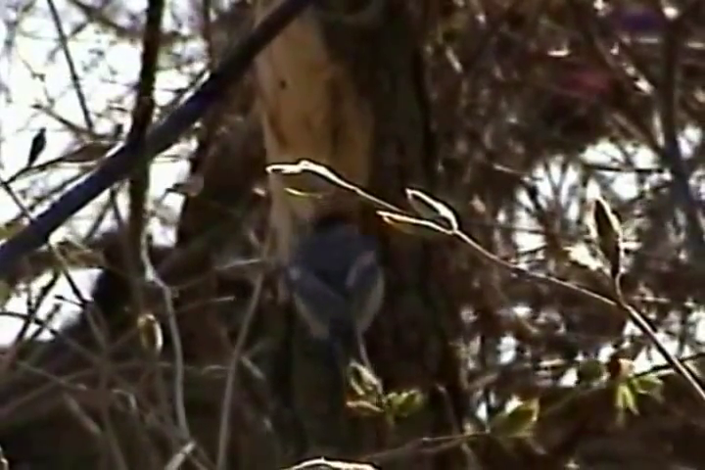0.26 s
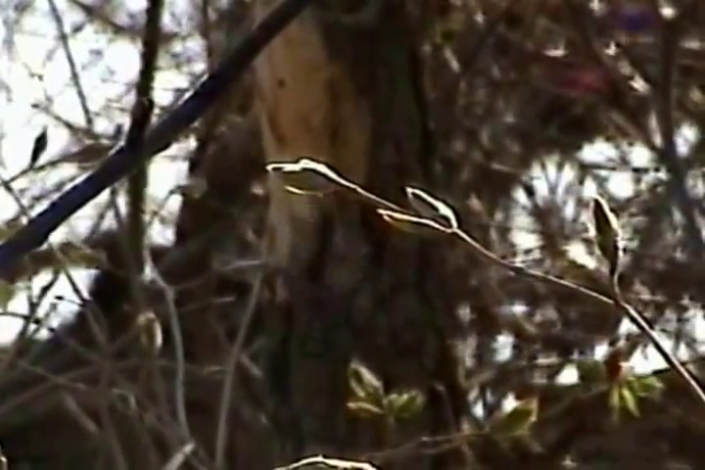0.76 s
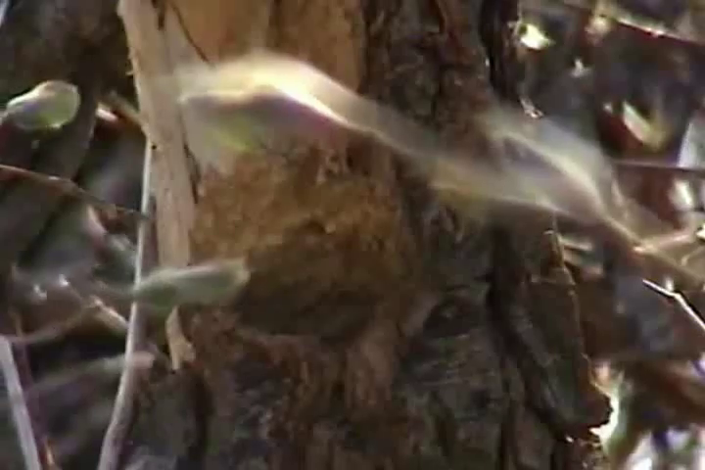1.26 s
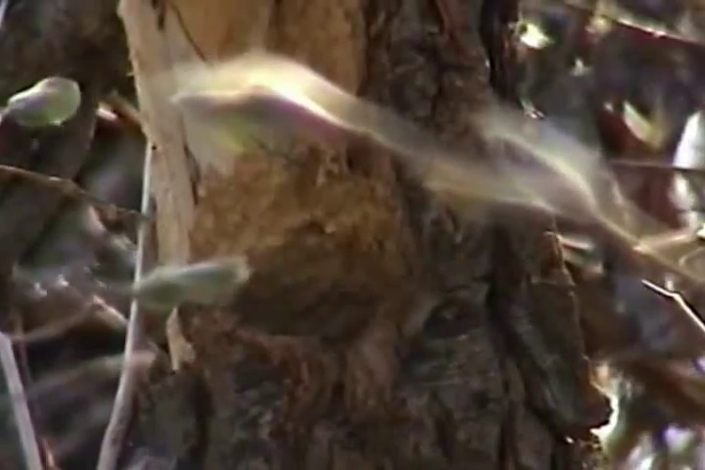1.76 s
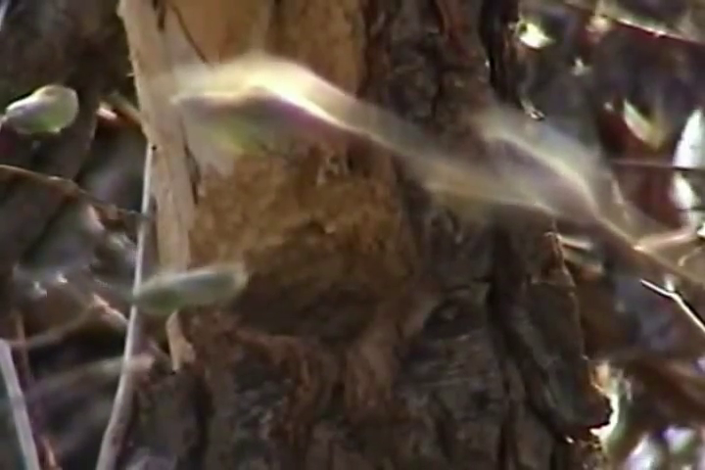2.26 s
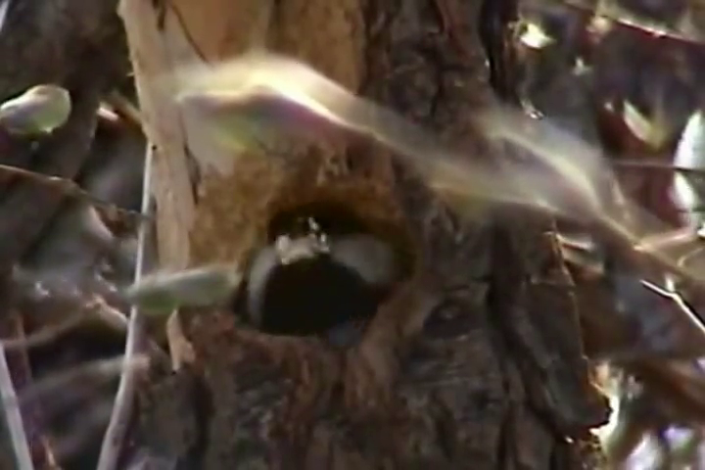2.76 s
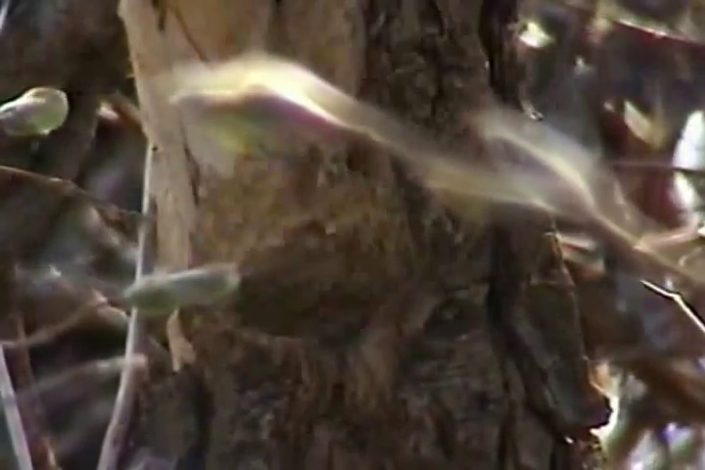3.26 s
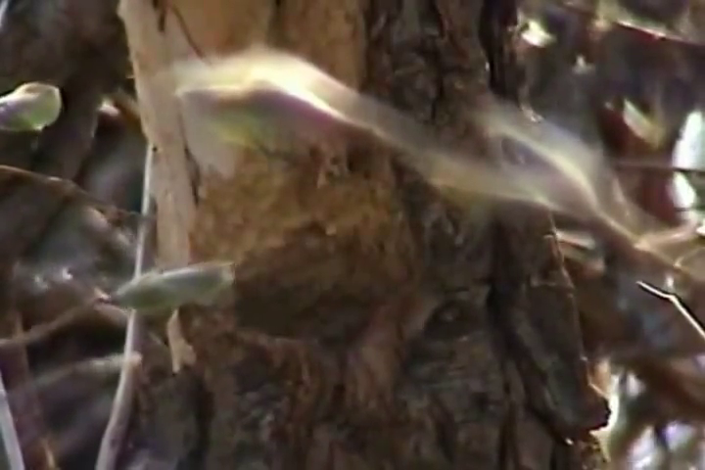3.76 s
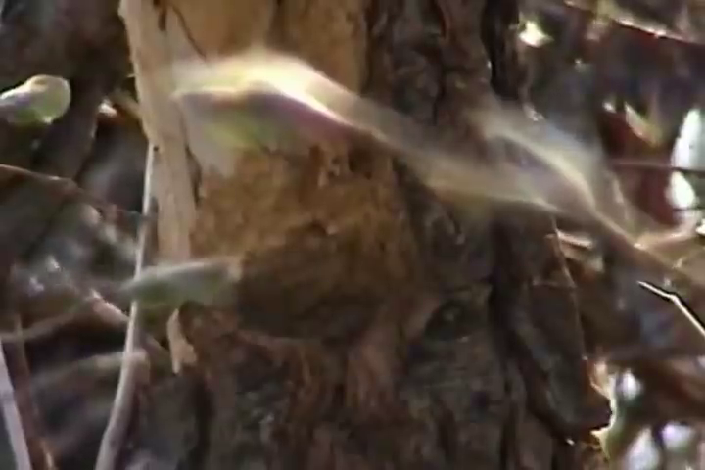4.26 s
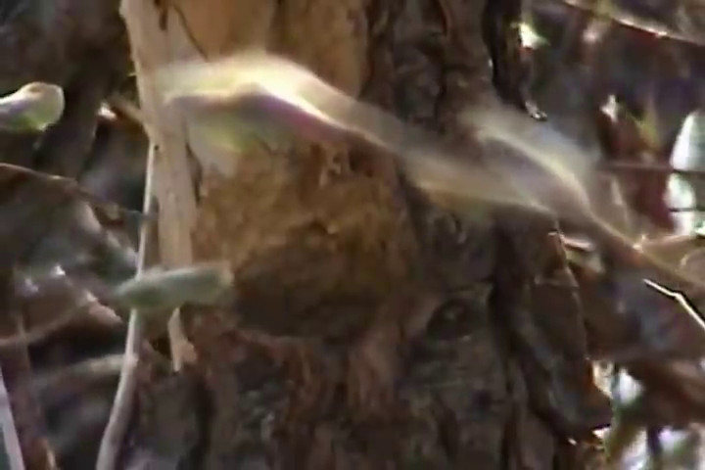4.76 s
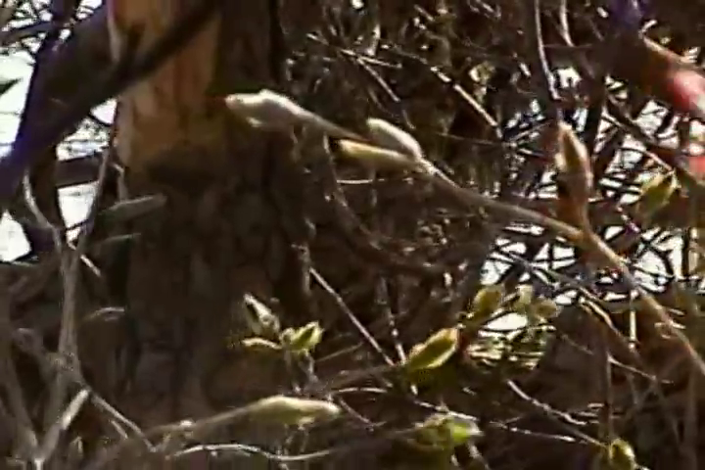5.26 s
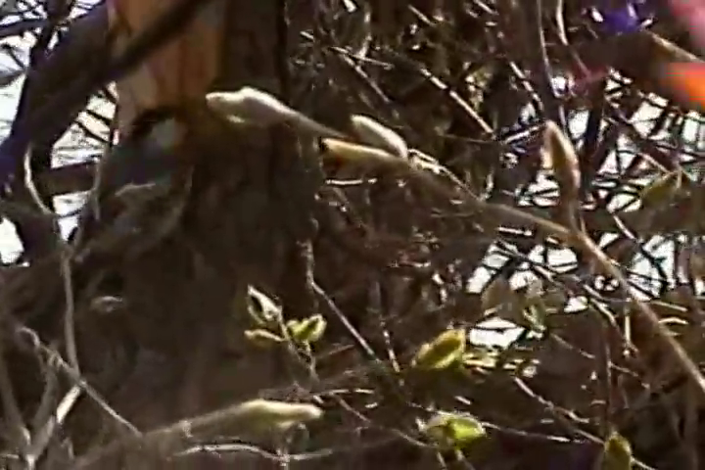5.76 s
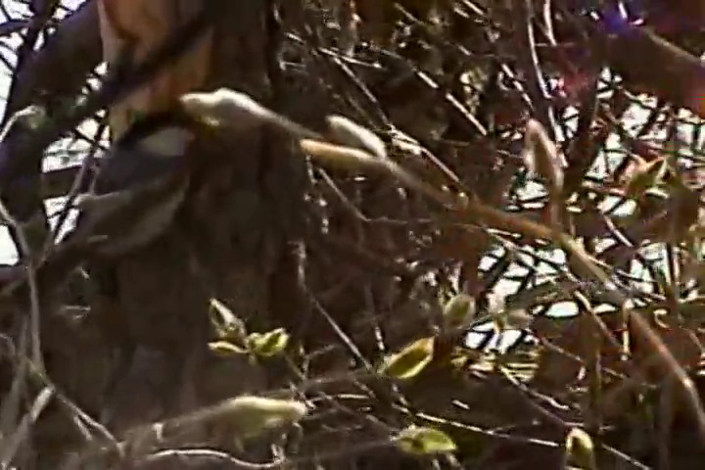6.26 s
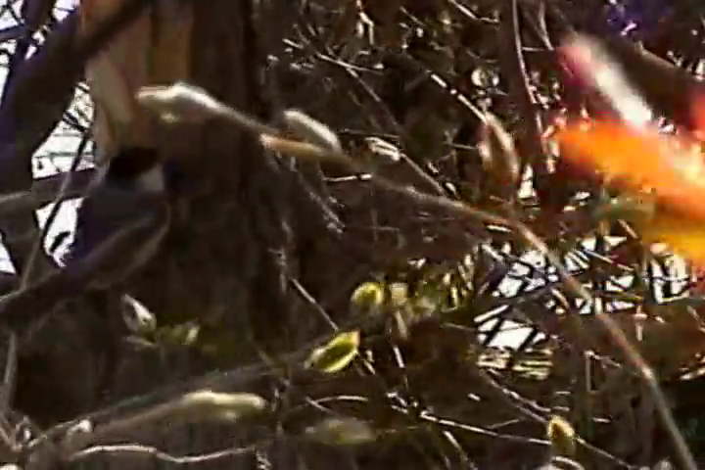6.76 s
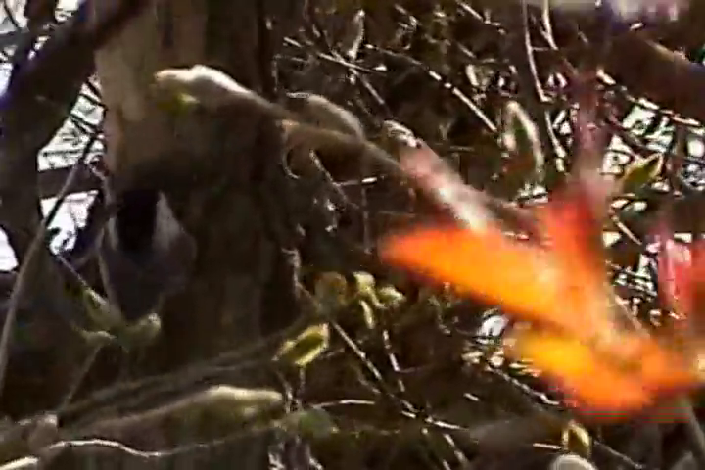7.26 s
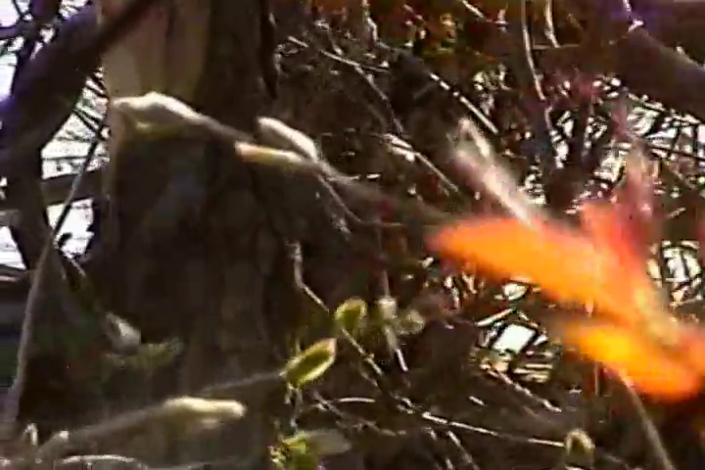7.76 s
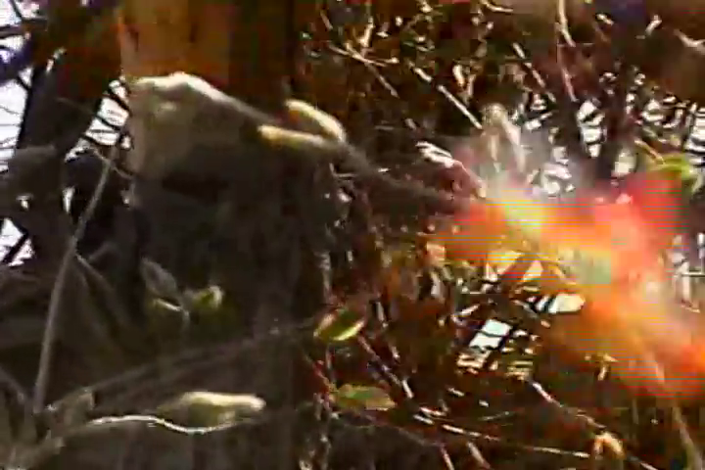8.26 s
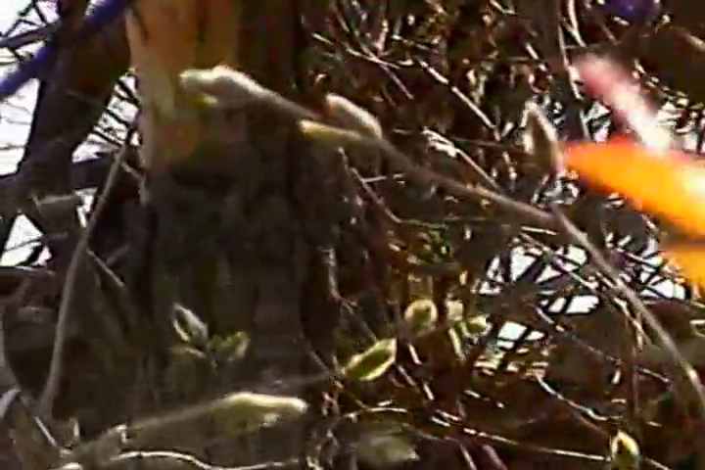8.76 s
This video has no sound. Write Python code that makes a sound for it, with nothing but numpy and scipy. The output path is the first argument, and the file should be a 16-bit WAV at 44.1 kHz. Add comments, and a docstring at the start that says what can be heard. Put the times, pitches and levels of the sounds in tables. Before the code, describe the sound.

A quiet outdoor thicket with a faint low rumble and soft hiss throughout. At about 0.6 seconds a small bird gives weak nasal squeaks, then bright, hoarse high chirps at 0.9 and 1.1. Faint distant birds slide downward between 1.3 and 2. From 2.1 to 2.7 a quick phrase of flicked whistles and scooped chirps ends in soft, falling hoots; a similar phrase follows from 3.35 to 4, its first hoot clearer and stronger. Quiet until 5, when low rasps come with a sudden puff of wind on the right. Squeaks and squeals follow at 5.2 to 5.6, then four sharp falling chicks from 5.7 to 6.05. Gusts keep buffeting softly on the right, with faint far birds. Piercing warbles and rising whistles sound at 7.3 to 7.55, a longer double-toned whistle to 7.8, then two quick warbles and a high buzz near 8.8 to 9. Calls echo off trunk and twigs.

```python
"""Squeals, soft hoots, rasps and quick whistles: chickadees call at a nest hole in a dead trunk among shrubs.
Each call is a stack of harmonics on a drawn pitch curve; in some, both sides of the syrinx sound at once.
Random echo taps throw the calls back from trunk and thicket, and other birds glide softly far off.
Shaped noise makes a low outdoor rumble and, from halfway, a breeze that buffets the right side."""
import sys
import numpy as np
from scipy import signal
from scipy.fft import rfft, irfft, next_fast_len
from scipy.io import wavfile
from scipy.ndimage import uniform_filter1d

SR = 44100
rng = np.random.default_rng(int(sys.argv[2]) if len(sys.argv) > 2 else 0)


def wav_record(signal):
    """Record a signal, one row per channel, as 16-bit PCM in the file named by sys.argv[1]."""
    frames = np.transpose(np.atleast_2d(signal))
    bounded = np.clip(frames, -1, 1)
    # unit amplitude maps onto the largest positive 16-bit level
    quanta = np.round(bounded * 32767).astype(np.int16)
    wavfile.write(sys.argv[1], SR, quanta)


N = 396900

# Call levels are before the trim of each group in the mix; spectra are relative.
# Soft hoots, nearly pure. Each row: start in seconds, held length in seconds, pitch in Hz, level in dB,
# swell over the note in dB, dive into it (0-1), bow and final sag of the pitch as shares.
HOOTS = [(2.395, .163, 2680, -26, -1, .8, .022, .12), (2.632, .093, 2052, -32, -1, 0, .014, .23),
         (3.684, .146, 2565, -18.7, 7, 1, 0, .1), (3.911, .103, 2030, -31.5, 3, 0, .032, .2)]
# Flicks: the pitch shoots up to a cusp and drops. Each row: cusp in seconds, rise in seconds,
# start in Hz, cusp in Hz, rising and falling level in dB at the favoured pitch.
FLICKS = [(2.111, 0.034, 2350, 5500, -33.5, -25.5), (2.259, 0.023, 4050, 5600, -28.5, -32),
          (3.365, 0.017, 3190, 6570, -27.5, -42), (3.531, 0.011, 5300, 6500, -21.5, -19.5)]
# Scoops: a rounded rise and a quick drop. Each row: top in seconds, rise in seconds, fall in seconds,
# start in Hz, top in Hz, level in dB at the favoured pitch.
SCOOPS = [(2.165, 0.032, 0.013, 1855, 3150, -17), (2.309, 0.037, 0.0098, 1765, 3060, -19.5),
          (3.341, 0.0091, .006, 2170, 2310, -29), (3.413, 0.029, .016, 2150, 3090, -20),
          (3.589, 0.034, 0.012, 2020, 3030, -19.5)]

# Arches: level swells and fades while pitch bends to a turning point and away. Each row of the next
# five tables: turning point in seconds, length before and after it in seconds, start in Hz,
# turning point in Hz, end in Hz, sharpness, level in dB, drop at the ends in dB.
# Nasal squeals.
SQUEALS = [ (.620, 0.068, 0.048, 1010, 1440, 1410, 0.71, -40.5, 15),
           (.690, 0.039, 0.023, 1421, 1902, 1520, 1.8, -32.5, 9.6),
           (5.425, 0.024, .036, 2150, 4836, 1610, 5, -31, 5.3),
           (5.570, .088, .068, 1581, 3955, 2190, 1.66, -30.5, 3.8)]
# Bright, hoarse chirps.
CHIRPS = [(1.112, .059, .026, 2250, 4020, 3950, 1.3, -26, 21),
          (5.229, .019, .017, 2850, 3650, 2150, 4.5, -32, 4)]
# Low rasps.
RASPS = [(4.968, .071, .036, 525, 610, 560, 1.1, -38.5, 12), (5.062, .028, .056, 580, 565, 545, .8, -40, 9)]
# A high buzz.
BUZZES = [(8.978, .017, 0.032, 5850, 5500, 5570, 0.85, -28.5, 8)]
# Clear whistles.
WHISTLES = [(5.424, .012, .022, 4630, 5000, 4630, 2.3, -33, 6.7),
            (5.485, 0.044, 0.023, 4750, 4740, 4830, 1, -38, 6),
            (7.499, .020, 0.047, 4000, 6920, 6540, 0.91, -20, 15.4),
            (7.543, 0.021, 0.0077, 6900, 7830, 8300, 2.5, -21, 3)]
# Notes from both sides of the syrinx. Each row: an arch for the low side, then one for the high side.
TWO_VOICED = [ ((.940, .053, .024, 2350, 4460, 4420, 2.6, -27.5, 14),
              (.942, .055, .022, 3650, 5285, 5330, 2.8, -23.5, 19)),
              ((7.785, .150, .026, 3470, 3760, 3640, 1.8, -18.5, 26),
              (7.672, .071, .135, 4950, 5360, 5420, .9, -25.5, 21))]

# Warbles: the high side swings, then settles; the low side follows in part. Each row: last peak in seconds,
# length before and after it in seconds, entry in Hz, peak in Hz, rest in Hz, depth of the swing as a share,
# level in dB, low side in Hz, low side level in dB, how far the low side follows (0-1).
WARBLES = [(7.377, 0.075, 0.02, 4750, 8430, 7360, .2, -22.5, 5380, -30.5, .55),
           (8.789, 0.028, 0.021, 6840, 7580, 5700, 0.34, -21, 4050, -47, 0.2),
           (8.872, .026, 0.019, 4740, 6780, 5370, 0.26, -23.5, 3390, -47, 0.1)]
# 'Chick' notes: a swing and a long fall. Each row: last peak in seconds, peak in Hz,
# level in dB at the favoured pitch, length before the peak in seconds.
CHICKS = [(5.738, 9040, -24.5, .036), (5.810, 8920, -24, 0.023), (5.948, 9520, -25, 0.032),
          (6.017, 9050, -26.5, 0.023)]
# Plain glides of birds far off. Each row: start in seconds, length in seconds, start in Hz, end in Hz, level in dB.
FAR_SONG = [(0.019, .2, 3530, 3420, -64), (1.27, .19, 4010, 2522, -50.5), (1.564, 0.19, 2537, 2427, -52.5),
            (1.861, 0.12, 2354, 2076, -53), (6.157, 0.09, 2460, 2605, -60), (6.343, 0.076, 2900, 2770, -60),
            (6.522, 0.098, 3330, 3240, -60.5), (7.009, 0.38, 4230, 4280, -64),
            (7.931, 0.16, 2227, 2090, -56), (8.377, 0.095, 3420, 3240, -54.5),
            (8.538, .2, 4490, 4250, -63.5)]

# Balance of the harmonics, from the first upwards. Each entry: level in dB.
HOOT_DB = [17, -1, -11, -27.5]
SQUEAL_DB = [-5, 1, -4.5, -17.5, -16.5, -20]
CHIRP_DB = [11.5, -1, -7.5]
WHISTLE_DB = [-0.5, -14]
RASP_DB = [-37, -34, -4.5, 7.5, 0, -2.5, -7, -16, -36, -17, -27, -17.5, -21, -32, -19, -20]
# Throat resonance in the hoots and in the squeals. Each row: frequency in Hz, gain in dB.
HOOT_THROAT = [(1500, -20.5), (2100, 5), (3000, -4), (3900, -14.5), (5100, -23.5), (7000, -3.5),
               (10000, -6.5)]
SQUEAL_THROAT = [(1500, -6.5), (1950, -11.5), (2400, 2), (3900, -1), (4800, 2), (7500, 2.5), (10000, -1)]
# Breathy hiss of hoarse calls. Each row: frequency in Hz, level in dB per Hz.
HISS = [(1100, -16), (2400, -3), (6000, 0), (10000, -14.5)]
# Decay of the thicket's echo. Each row: frequency in Hz, time to fall by 60 dB in seconds.
THICKET = [(2400, 1.25), (3800, 1.044), (5200, 0.9), (10000, 0.31)]

# Gusts on the microphone. Each row: full strength from in seconds, length in seconds, relative level in dB.
GUSTS = [(5.066, 0.54, -44), (5.6, .2, -51.5), (6.195, 0.03, -45), (6.472, 0.022, -45),
         (6.867, 0.17, -46.5), (7.156, 1.0, -43), (8.253, 0.53, -45.5), (8.925, 0.049, -46.5)]
# Sudden puffs of wind. Each row: start in seconds, relative level in dB, length in seconds.
PUFFS = [(5.057, -31.5, 0.097), (5.147, -31, 0.02), (5.295, -43.5, 0.024), (5.895, -52.5, 0.051)]
# Colour of the gusts and of the brighter puffs. Each row: frequency in Hz, level in dB per Hz.
BUFFET = [(25, -15), (80, 3.5), (170, 1), (300, -10), (520, -20), (3000, -56)]
PUFF = [(30, -5), (130, 7.5), (400, 5), (800, -10.5), (10000, -41)]
# Colour of the outdoor air. Each row: frequency in Hz, level in dB per Hz.
AIR = [(15, -35.5), (25, -2.5), (139, -8), (254, -12.5), (288, -11), (465, -14.5), (645, -15.5),
       (10300, -28), (13400, -98), (22000, -120)]
# How alike left and right are in the air. Each row: frequency in Hz, likeness as a share.
AIR_SAME = [(60, 0.72), (800, 0.028), (10000, .25)]

ALONG = np.linspace(0, 1, 300)  # position along a note
ARCH_EDGE_S, ARCH_EDGE_DB = 0.0097, 3.5  # every arch fades in and out
SAG_S, SAG_DB = .023, 13.5  # at the end of a hoot pitch and level sag together
DIVE, DIVE_S, UNDERSHOOT, RECOVER_S = 1.5, .0042, .36, .017  # the dive overshoots and recovers (shares, s)
HOOT_ATTACK_S, HOOT_ATTACK_DB = 0.0033, 24
FLICK_FALL_S, FLICK_DROP_S, FLICK_LOW_HZ = 0.018, .0042, 1725  # fall length, its time constant, landing pitch
FLICK_BEST_HZ, FLICK_DB_PER_OCTAVE = 3170, 25.5  # loudest at this pitch, weaker away from it
SCOOP_END_HZ, SCOOP_SHARPNESS = 2320, 0.99
SCOOP_BEST_HZ, SCOOP_DB_PER_OCTAVE = 2767, 37.5
SWING_S, ENTRY_S, SETTLE_S = 0.03, .013, .0095  # one swing; leaving the entry pitch; settling
WARBLE_ATTACK_S, WARBLE_RELEASE_S, WARBLE_EDGE_DB = .02, 0.0065, 22.5
CHICK_FALL_S, CHICK_REST, CHICK_DEPTH, CHICK_ENTRY = 0.037, .61, .13, 0.95  # s, then shares of the peak pitch
CHICK_BEST_HZ, CHICK_DB_PER_OCTAVE, CHICK_EDGE_DB = 6600, 15.5, 18
UNDERTONE_HZ, UNDERTONE_END_HZ, UNDERTONE_DB = 5075, 4900, -13.5  # a soft tone under each 'chick' fall
GLIDE_EDGE_DB = 7
GUST_RISE_S, GUST_FALL_S, LULL_DB = 0.072, 0.089, -56.5
AIR_LEVEL_DB = -50.79
EDGE_HZ = 10550  # edge of the low-pass in Hz; the sound is dark above it


def birds():
    """All the calls, near and far, each group with its own trim and share of echo."""
    return (quick_hoots() + clear_hoots() + squeals_and_chicks()
            + chirps_rasps_and_buzzes() + whistles_and_warbles() + far_birds())


def quick_hoots():
    """Flicks, scoops and the first hoot: a low, slightly rough voice with breath in it."""
    notes = [flick(*row) for row in FLICKS] + [scoop(*row) for row in SCOOPS] + [hoot(*HOOTS[0])]
    calls = sing(notes, HOOT_DB, jitter=0.0054, jitter_hz=203, shimmer_db=3.0, throat=HOOT_THROAT)
    calls = hoarse(calls, hiss_db=-28.5)
    return gain_of(-3.0) * outdoors(calls, near_db=-3, far_db=-9.0, balance_db=1.3, same=0.49)


def clear_hoots():
    """The later hoots reach the microphone more directly and stay steady."""
    notes = [hoot(*row) for row in HOOTS[1:]]
    calls = sing(notes, HOOT_DB, jitter=.002, jitter_hz=200, shimmer_db=1.8, throat=HOOT_THROAT)
    return gain_of(-1) * outdoors(calls, near_db=-17, far_db=-15, balance_db=1.9)


def squeals_and_chicks():
    """Nasal squeals with fluttering harmonics, and high falling 'chick' notes."""
    squeals = sing(arches(SQUEALS), SQUEAL_DB, jitter=0.0089, jitter_hz=610, shimmer_db=2.0,
                   throat=SQUEAL_THROAT, flutter_db=3.5)
    chicks = sing(chick_notes(), WHISTLE_DB, jitter=.006, jitter_hz=600, shimmer_db=1)
    calls = hoarse(squeals + chicks, hiss_db=-23.5)
    return gain_of(-2.5) * outdoors(calls, near_db=-3.5, far_db=-7, balance_db=0.5, same=0.91)


def chirps_rasps_and_buzzes():
    """The harsh calls: strong pitch jitter, and fluttering harmonics in the chirps and rasps."""
    chirps = sing(arches(CHIRPS), CHIRP_DB, jitter=.025, jitter_hz=900, shimmer_db=1.6, flutter_db=2)
    rasps = sing(arches(RASPS), RASP_DB, jitter=.037, jitter_hz=220, shimmer_db=3, flutter_db=5)
    buzzes = sing(arches(BUZZES), CHIRP_DB, jitter=.07, jitter_hz=1000, shimmer_db=2)
    return gain_of(-0.5) * outdoors(chirps + rasps + buzzes, near_db=-3.0, far_db=-7.0, balance_db=.8)


def whistles_and_warbles():
    """Clear whistles from one side of the syrinx; double notes and warbles from both."""
    whistles = sing(arches(WHISTLES), WHISTLE_DB, jitter=0.0059, jitter_hz=500, shimmer_db=3.5)
    doubles = sing_both([two_voiced(*pair) for pair in TWO_VOICED],
                        jitter=.005, jitter_hz=400, shimmer_db=1.2, coupling_db=-12)
    warbles = sing_both([warble(*row) for row in WARBLES],
                        jitter=.012, jitter_hz=800, shimmer_db=1.8, coupling_db=-11)
    calls = hoarse(whistles + doubles + warbles, hiss_db=-23)
    return gain_of(-6.0) * outdoors(calls, near_db=-3, far_db=-5.5, balance_db=0.2)


def far_birds():
    """Plain glides with strong echo, leaning to the right."""
    song = sing([glide(*row) for row in FAR_SONG], WHISTLE_DB, jitter=.03, jitter_hz=90, shimmer_db=3)
    return gain_of(-3.5) * outdoors(song, near_db=-1.5, far_db=0.5, balance_db=-5)


def hoot(start, held_s, pitch_hz, level_db, swell_db, dive, bow, droop):
    """A held tone, with or without a dive onto it, that sags as it ends. Rows of (s, Hz, dB)."""
    t = ALONG * (held_s + SAG_S)
    held = np.minimum(t / held_s, 1)
    sag = np.maximum(t - held_s, 0) / SAG_S
    entry = dive * (DIVE * np.exp(-t / DIVE_S) - UNDERSHOOT * np.exp(-t / RECOVER_S))
    hz = pitch_hz * (1 + entry + bow * np.sin(np.pi * held) - droop * sag)
    attack_db = HOOT_ATTACK_DB * np.exp(-t / HOOT_ATTACK_S)
    db = level_db + swell_db * (held - .5) - attack_db - SAG_DB * sag ** 0.65
    return np.transpose([start + t, hz, db])


def flick(cusp_s, rise_s, start_hz, cusp_hz, rising_db, falling_db):
    """An ever faster rise, then a steep drop. Rows of (s, Hz, dB)."""
    t = ALONG * (rise_s + FLICK_FALL_S) - rise_s
    rising_hz = start_hz * (cusp_hz / start_hz) ** ((1 + t / rise_s) ** 2)
    falling_hz = FLICK_LOW_HZ + (cusp_hz - FLICK_LOW_HZ) * np.exp(-abs(t) / FLICK_DROP_S)
    hz = np.where(t < 0, rising_hz, falling_hz)
    db = np.where(t < 0, rising_db, falling_db) - off_best(hz, FLICK_BEST_HZ, FLICK_DB_PER_OCTAVE)
    return np.transpose([cusp_s + t, hz, db])


def scoop(top_s, rise_s, fall_s, start_hz, top_hz, level_db):
    """An arch that is loudest where its pitch comes nearest the favoured one. Rows of (s, Hz, dB)."""
    s, hz, db = arch(top_s, rise_s, fall_s, start_hz, top_hz, SCOOP_END_HZ, SCOOP_SHARPNESS, level_db, 0).T
    return np.transpose([s, hz, db - off_best(hz, SCOOP_BEST_HZ, SCOOP_DB_PER_OCTAVE)])


def off_best(hz, best_hz, db_per_octave):
    """Loss in dB as the pitch leaves the one that the throat favours."""
    return db_per_octave * abs(np.log2(hz / best_hz))


def arch(turn_s, before_s, after_s, start_hz, turn_hz, end_hz, sharpness, level_db, ends_db):
    """Level swells and fades while pitch bends to a turning point and away. Rows of (s, Hz, dB)."""
    t = ALONG * (before_s + after_s) - before_s
    slack = 1 - abs(np.cos(np.pi / 2 * t / np.where(t < 0, before_s, after_s))) ** sharpness
    hz = turn_hz * (np.where(t < 0, start_hz, end_hz) / turn_hz) ** slack
    faded = np.maximum(1 - np.minimum(t + before_s, after_s - t) / ARCH_EDGE_S, 0)
    return np.transpose([turn_s + t, hz, level_db - ends_db * slack - ARCH_EDGE_DB * faded])


def arches(table):
    """One arched note for each row."""
    return [arch(*row) for row in table]


def chick_notes():
    """The same gesture each time, entered earlier or later; the other side holds a soft tone under its fall."""
    notes = []
    for peak_s, peak_hz, level_db, before_s in CHICKS:
        t, hz, faded = swing(before_s, CHICK_FALL_S, CHICK_ENTRY * peak_hz, peak_hz,
                             CHICK_REST * peak_hz, CHICK_DEPTH)
        edge_db = CHICK_EDGE_DB * faded * np.where(t < 0, .3, 1)  # gentler on the way in
        db = level_db - off_best(hz, CHICK_BEST_HZ, CHICK_DB_PER_OCTAVE) - edge_db
        notes.append(np.transpose([peak_s + t, hz, db]))
        notes.append(glide(peak_s + 0.0034, CHICK_FALL_S, UNDERTONE_HZ, UNDERTONE_END_HZ,
                           level_db + UNDERTONE_DB))
    return notes


def swing(before_s, after_s, entry_hz, peak_hz, rest_hz, depth):
    """Time from the last peak, a pitch that swings and settles, and how far the note is faded."""
    t = ALONG * (before_s + after_s) - before_s
    swinging_hz = peak_hz * (1 - depth * abs(np.sin(np.pi * t / SWING_S)) ** 1.5)
    settling_hz = rest_hz + (peak_hz - rest_hz) * np.exp(-abs(t) / SETTLE_S)
    hz = np.where(t < 0, swinging_hz, settling_hz)
    hz = hz + (entry_hz - hz) * np.exp(-((t + before_s) / ENTRY_S) ** 2)
    fade_in = np.maximum(1 - (t + before_s) / WARBLE_ATTACK_S, 0) ** 2
    fade_out = np.maximum(1 - (after_s - t) / WARBLE_RELEASE_S, 0)
    return t, hz, fade_in + fade_out


def warble(peak_s, before_s, after_s, entry_hz, peak_hz, rest_hz, depth, level_db, low_hz, low_db, follow):
    """A swinging high side with a low side in tow. Rows of (s, low Hz, low dB, high Hz, high dB)."""
    t, hz, faded = swing(before_s, after_s, entry_hz, peak_hz, rest_hz, depth)
    following_hz = low_hz * (hz / peak_hz) ** follow
    return np.transpose([peak_s + t, following_hz, low_db - 5 * faded, hz, level_db - WARBLE_EDGE_DB * faded])


def two_voiced(low_row, high_row):
    """Two overlapping arches. Rows of (s, low Hz, low dB, high Hz, high dB)."""
    sides = arch(*low_row).T, arch(*high_row).T
    s = np.union1d(sides[0][0], sides[1][0])
    columns = []
    for at, hz, db in sides:
        columns += [np.interp(s, at, hz), np.interp(s, at, db, left=-90, right=-90)]
    return np.transpose([s, *columns])


def glide(start, length, start_hz, end_hz, level_db):
    """A straight slide that swells and fades. Rows of (s, Hz, dB)."""
    hz = start_hz + (end_hz - start_hz) * ALONG
    db = level_db - GLIDE_EDGE_DB * (2 * ALONG - 1) ** 2
    return np.transpose([start + length * ALONG, hz, db])


def sing(notes, levels_db, jitter, jitter_hz, shimmer_db, throat=None, flutter_db=0):
    """Notes from one side of the syrinx."""
    out = np.zeros(N)
    for rows in notes:
        start, (hz, db) = contours(rows)
        phase, size = membrane(hz, db, jitter, jitter_hz, shimmer_db)
        add(out, start, size * harmonics(phase, hz, levels_db, throat, flutter_db))
    return out


def sing_both(notes, jitter, jitter_hz, shimmer_db, coupling_db):
    """Both sides sound at once and modulate each other, which adds a tone at the sum of their pitches."""
    out = np.zeros(N)
    for rows in notes:
        start, (low_hz, low_db, high_hz, high_db) = contours(rows)
        low, low_size = membrane(low_hz, low_db, jitter, jitter_hz, shimmer_db)
        high, high_size = membrane(high_hz, high_db, jitter, jitter_hz, shimmer_db)
        add(out, start, low_size * harmonics(low, low_hz, WHISTLE_DB))
        add(out, start, high_size * harmonics(high, high_hz, WHISTLE_DB))
        add(out, start, gain_of(coupling_db) * np.minimum(low_size, high_size) * np.sin(low + high))
    return out


def contours(rows):
    """Start time and the columns of a note as smooth curves, one value a sample."""
    s, *columns = np.transpose(rows)
    t = np.arange(s.min(), s.max(), 1 / SR)
    return s.min(), [uniform_filter1d(np.interp(t, s, c), size=130) for c in columns]


def membrane(hz, db, jitter, jitter_hz, shimmer_db):
    """One side of the syrinx: its phase and its amplitude, both a little unsteady."""
    count = len(hz)
    phase = 2 * np.pi * np.cumsum(hz * (1 + jitter * wobble(count, jitter_hz))) / SR
    edge = np.minimum(np.arange(count), np.arange(count)[::-1]) / (.002 * SR)  # 2 ms fades
    size = np.sqrt(2) * gain_of(db + shimmer_db * wobble(count, jitter_hz))
    return phase, size * np.minimum(edge, 1)


def harmonics(phase, hz, levels_db, throat=None, flutter_db=0):
    """Harmonics with about the power of one sine; the throat may favour some, and each may flutter."""
    k = np.arange(1, len(levels_db) + 1)[:, None]
    gains = gain_of(np.array(levels_db)[:, None] + (read(throat, k * hz) if throat else 0))
    gains = gains / np.linalg.norm(gains, axis=0)
    gains = gains * gain_of([flutter_db * wobble(len(hz), hz=104) for _ in k])
    return np.sum(gains * np.sin(k * phase) * (k * hz < SR / 2), axis=0)


def hoarse(x, hiss_db):
    """Air rushing through the syrinx adds a hiss that follows the loudness of the call."""
    loudness = np.sqrt(abs(uniform_filter1d(x ** 2, size=200)))
    return x + gain_of(hiss_db) * loudness * noise(HISS)


def outdoors(x, near_db, far_db, balance_db, near_t60=0.23, same=0.27):
    """Direct sound, quick scatter from trunk and twigs, and the long tail of the thicket."""
    t = np.arange(SR) / SR
    taps = rng.standard_normal((3, SR)) * (rng.random((3, SR)) < 4000 / SR)  # about 4000 echoes a second
    # the two ports of the microphone lie close together and share some of the echoes
    taps = np.sqrt(same) * taps[0] + np.sqrt(1 - same) * taps[1:]
    near = taps * gain_of(-60 * t / near_t60) * (t > .001)
    # the reversed taps give the tail its own pattern; each band dies away at its own rate
    hz, frame_s, z = signal.stft(taps[:, ::-1], SR, nperseg=256)
    decay = gain_of(-60 * frame_s / read(THICKET, hz)[:, None])
    far = signal.istft(z * decay, SR, nperseg=256)[1][:, :SR]
    far *= np.minimum(t / 0.0017, 1)
    echoes = (gain_of(near_db) * evened(near) + gain_of(far_db) * evened(far)) / np.sqrt(SR)
    direct = x * gain_of([[balance_db / 2], [-balance_db / 2]])
    return direct + signal.fftconvolve(x[None], echoes, axes=1)[:, :N]


def wind():
    """Lumpy eddies on the right port, in gusts with a lull between; sudden puffs are brighter."""
    t = np.arange(N) / SR
    gusts = [np.interp(t, [at - GUST_RISE_S, at, at + length, at + length + GUST_FALL_S],
                       [LULL_DB, level_db, level_db, LULL_DB])
             for at, length, level_db in GUSTS]
    strength_db = np.max(gusts, axis=0) + 5.0 + 3.45 * wobble(N, hz=22.1)
    eddies = noise(BUFFET) * (t > GUSTS[0][0]) * gain_of(strength_db)
    blow = np.zeros(N)
    for at, level_db, length in PUFFS:
        shape = np.interp(t, [at, at + 0.0037, at + length, at + 2 * length], [0.016, 0.88, 0.22, 0.025])
        blow += gain_of(level_db) * shape
    return np.array([np.zeros(N), eddies + blow * noise(PUFF)])


def air():
    """Distant outdoor rumble and hiss, partly shared by the two channels."""
    same = read(AIR_SAME, np.fft.rfftfreq(N, 1 / SR))
    left, other = noise(AIR), noise(AIR)
    right = irfft(same * rfft(left) + np.sqrt(1 - same ** 2) * rfft(other), N)
    return gain_of(AIR_LEVEL_DB) * np.array([left, right])


def noise(spectrum):
    """Steady noise of rms 1 with the given spectrum."""
    gains = gain_of(read(spectrum, np.fft.rfftfreq(N, 1 / SR)))
    return evened(irfft(rfft(rng.standard_normal(N)) * gains, N))


def wobble(length, hz):
    """Random wavering of about rms 1, up to about hz times a second."""
    size = next_fast_len(max(length, SR // 2))
    f = np.fft.rfftfreq(size, 1 / SR)
    return evened(irfft(rfft(rng.standard_normal(size)) * np.exp(-(f / hz) ** 2), size))[:length]


def gain_of(db):
    """Decibels to amplitude."""
    return 10 ** (np.asarray(db) / 20)


def evened(x):
    """Scales to rms 1."""
    return x / np.sqrt(np.mean(abs(x) ** 2) + 1e-20)


def read(points, hz):
    """Reads a spectrum on a log-frequency axis."""
    f, value = np.transpose(points)
    return np.interp(np.log(hz + 1), np.log(f + 1), value)


def add(mix, s, sound):
    """Mixes a sound in at time s."""
    part = mix[round(s * SR):][:len(sound)]
    part += sound[:len(part)]


def scene():
    """Birds, wind and air."""
    return birds() + wind() + air()


def record(dry):
    """A steep low-pass darkens the sound above its edge."""
    lowpass = signal.firwin(411, EDGE_HZ, window=("kaiser", 8), fs=SR)
    return signal.oaconvolve(dry, lowpass[None], "same")


dry = scene()
out = record(dry)
wav_record(out)
```